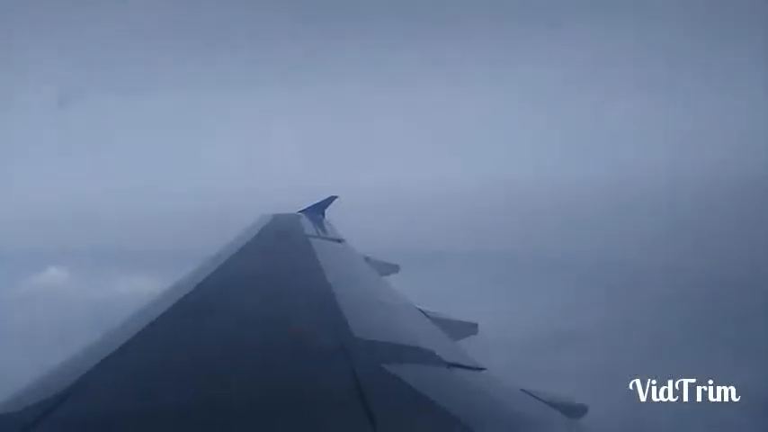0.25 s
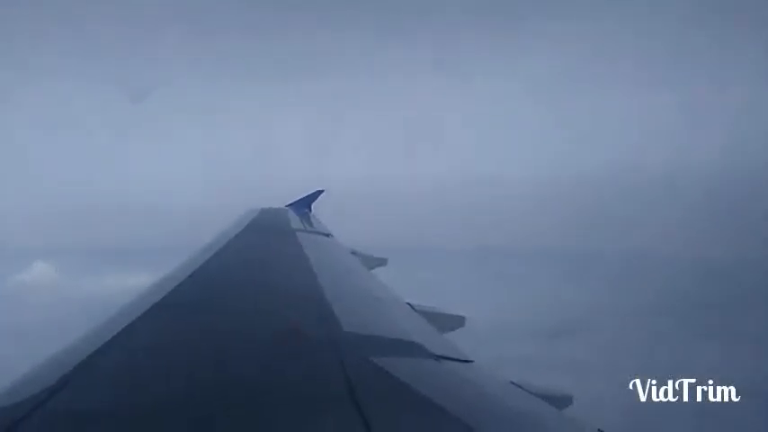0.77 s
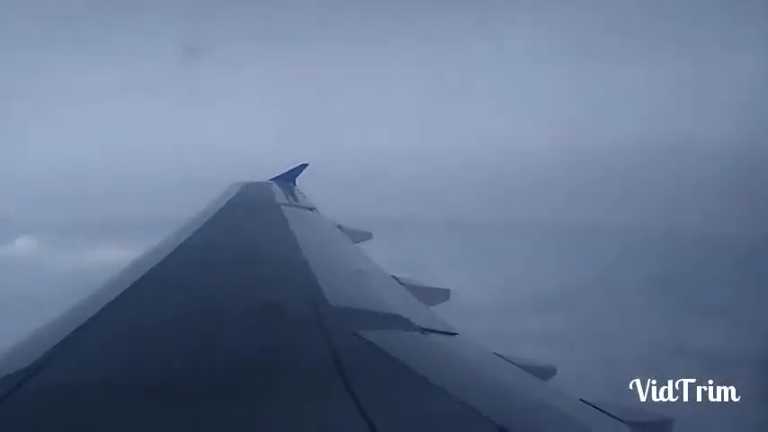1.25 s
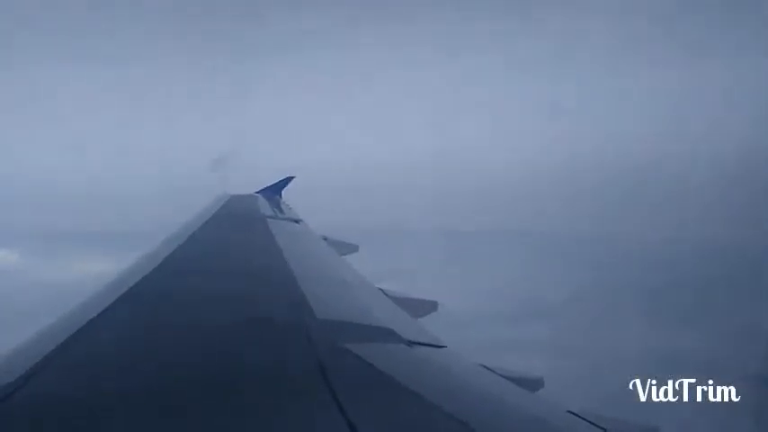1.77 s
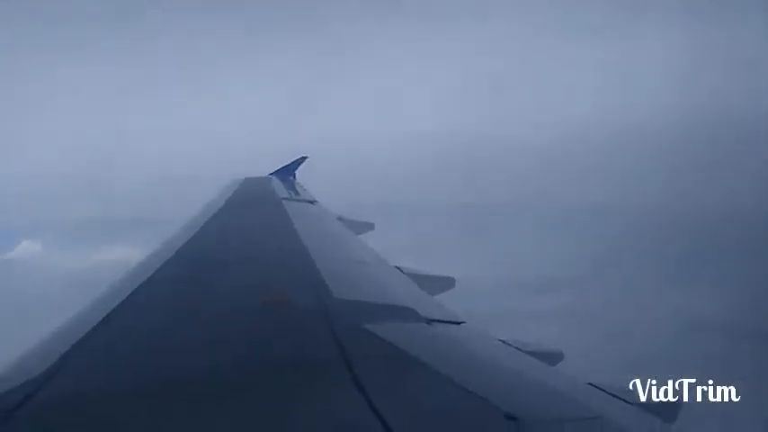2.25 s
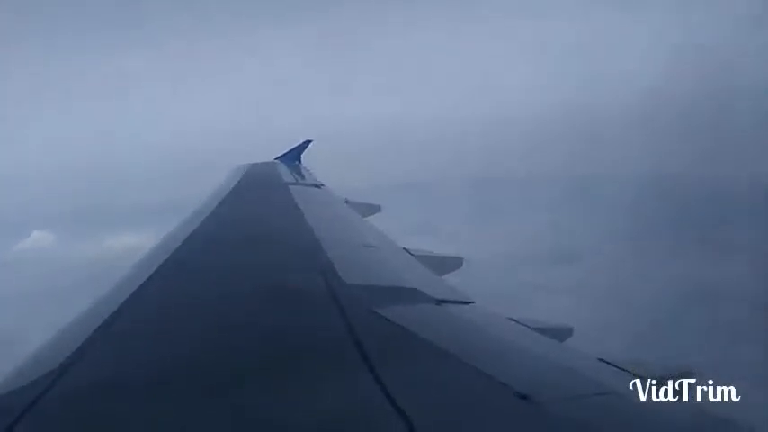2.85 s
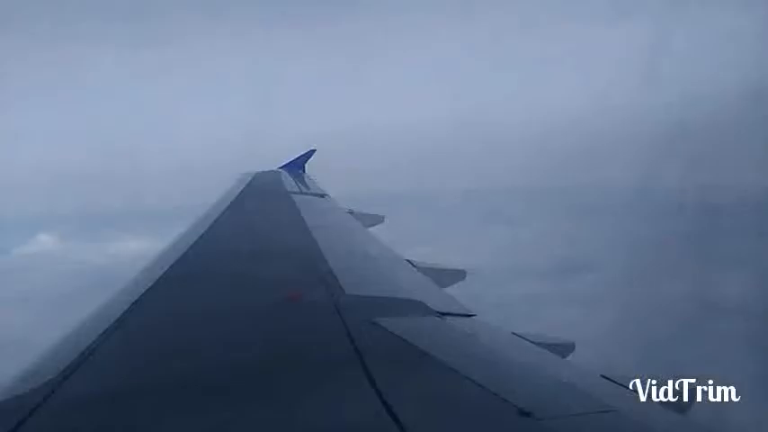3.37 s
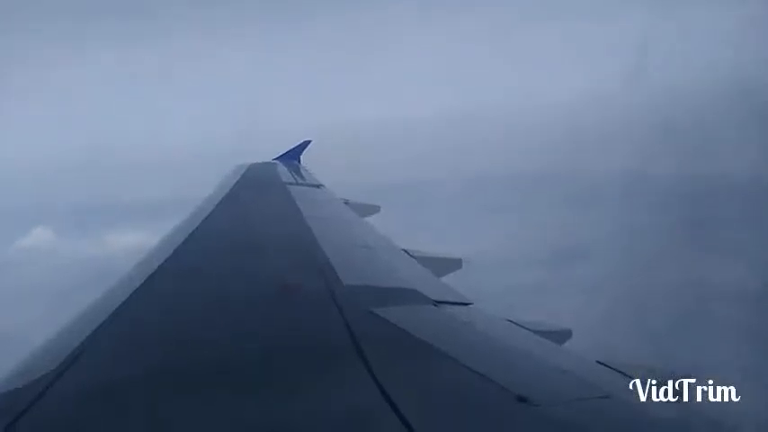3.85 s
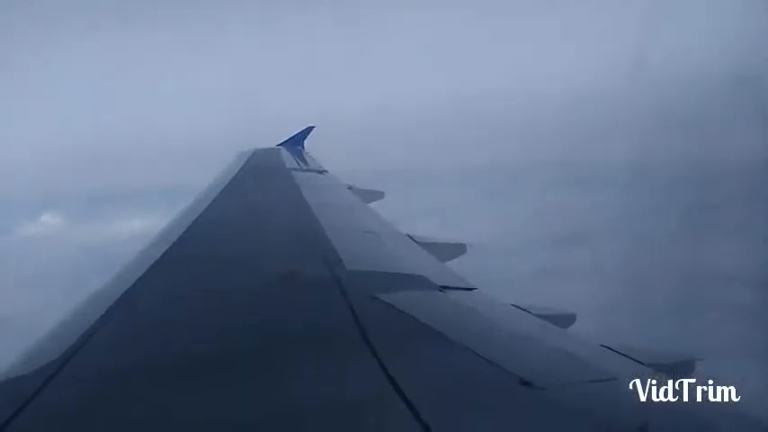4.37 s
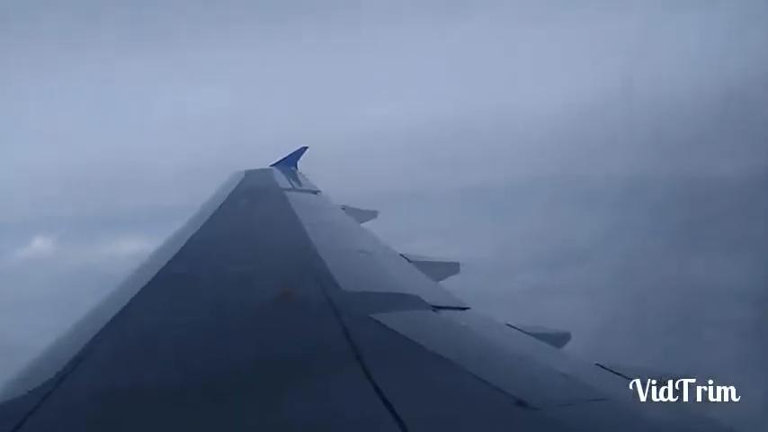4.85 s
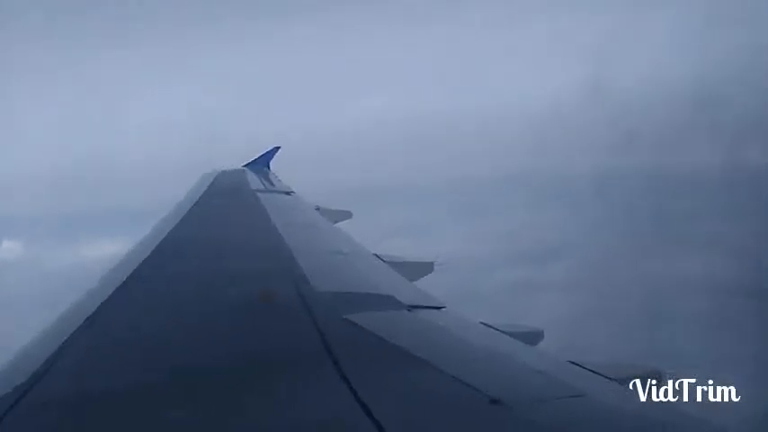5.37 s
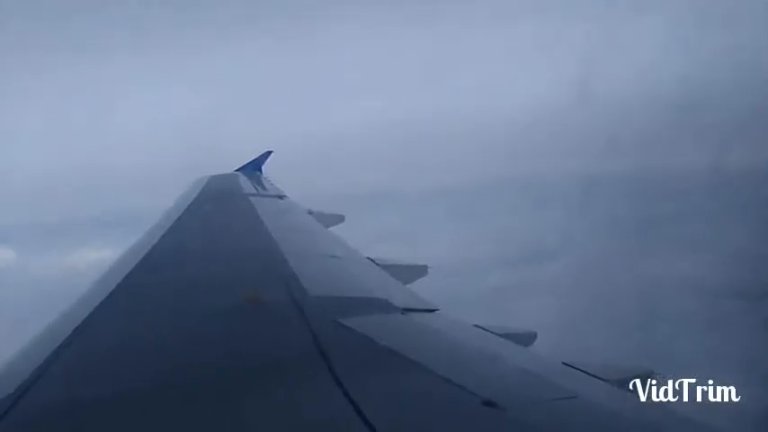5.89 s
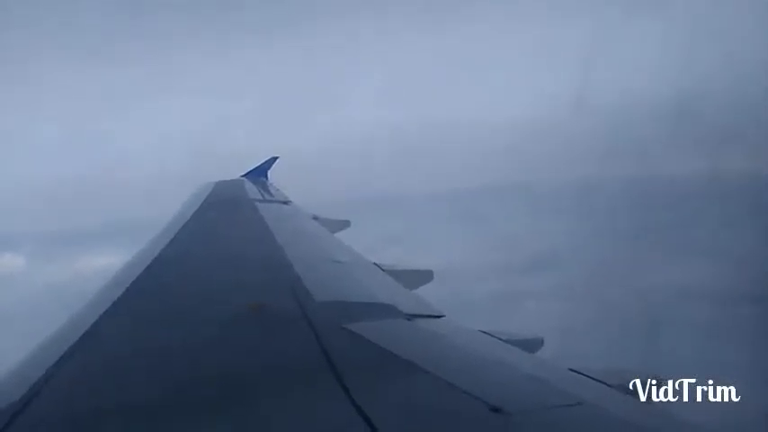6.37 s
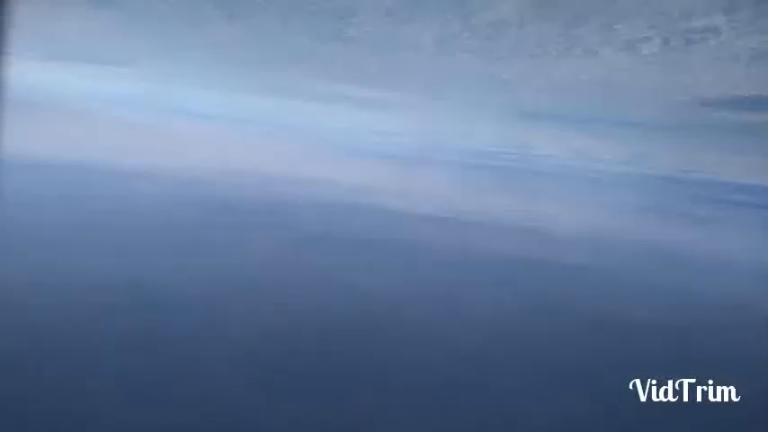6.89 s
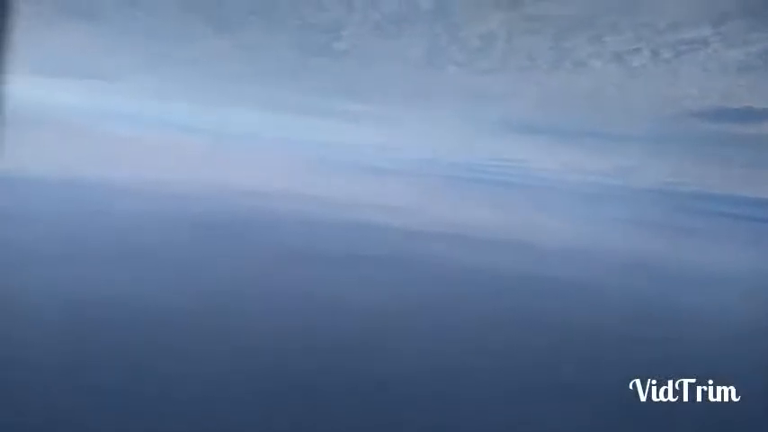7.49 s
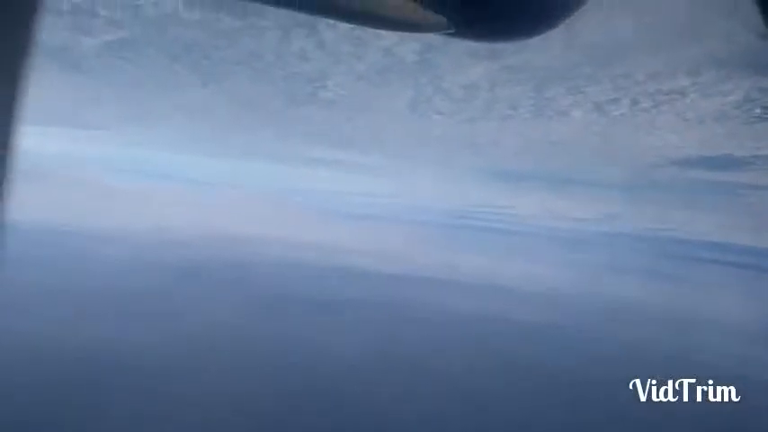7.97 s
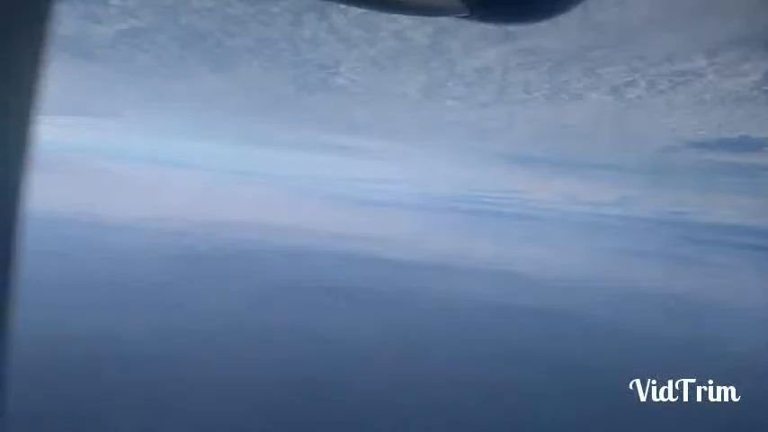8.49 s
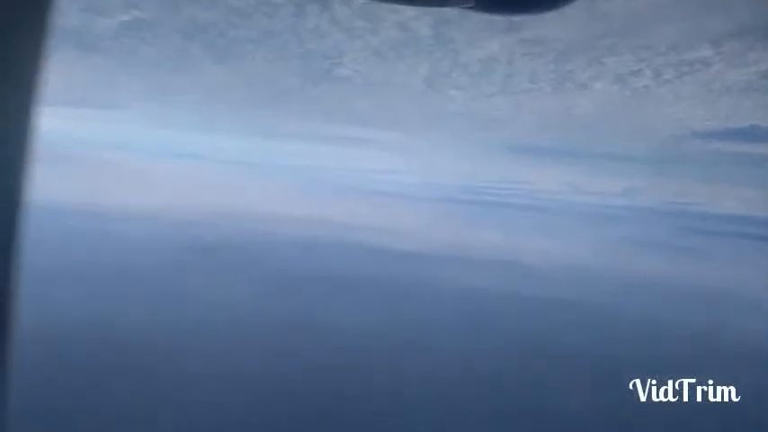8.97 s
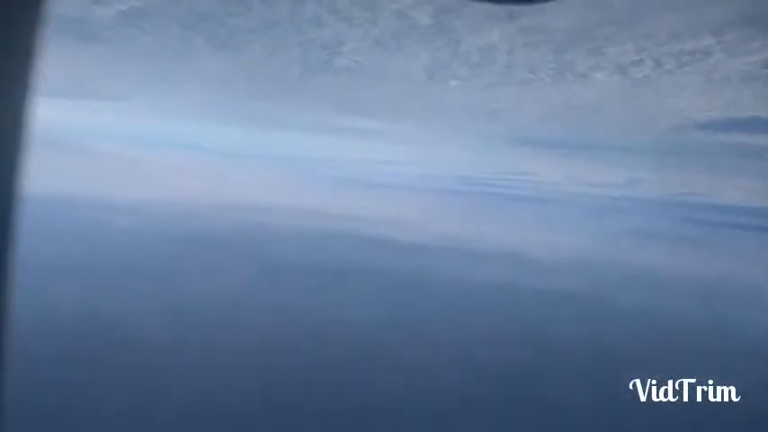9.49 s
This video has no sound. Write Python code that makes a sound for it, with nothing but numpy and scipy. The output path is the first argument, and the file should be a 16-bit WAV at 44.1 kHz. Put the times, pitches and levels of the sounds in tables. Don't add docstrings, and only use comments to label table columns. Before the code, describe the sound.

Continuous broadband cabin roar, bass-heavy and fluttering, with wavering engine hum and faint pump whine, heard close by the wall of an aircraft in flight. A soft finger rustle accompanies a change of colour early on. After an abrupt gap of silence, a louder, steadier drone with a panel hum and more vent hiss begins. A palm then half covers the microphone, dropping the level, while irregular dull thumps knock the panel.

```python
import sys
import numpy as np
from scipy import signal
from scipy.io import wavfile
from scipy.ndimage import uniform_filter1d, minimum_filter1d

SR = 44100
rng = np.random.default_rng(int(sys.argv[2]) if len(sys.argv) > 2 else 0)


def volts(x):
    e = np.asarray(x, float) / 20
    return 10 ** e


def digitize_waveform(pressure):
    field = np.atleast_2d(pressure).T
    bounded = np.clip(field, -1, 1)
    quanta = np.round(bounded * 32767).astype(np.int16)
    wavfile.write(sys.argv[1], SR, quanta)


N = 429074
FRAME, HOP = 2048, 512
CUT_S, RESUME_S = 6.77396, 7.33338

# (time [s], grip number)
GRIP = [
    (0, 0.0),
    (2.0, 0.06),
    (3.1, 0.95),
    (6.8, 1.0),
    (7.3, 2.0),
    (8.67, 2.02),
    (8.79, 2.7),
    (8.95, 2.98),
    (9.73, 3.0),
]
# (frequency [Hz], level [dB per Hz])
RUMBLE_SPECTRA = [
    [(15, -40.5), (25, -7), (125, 0), (179, -3.5), (224, 1), (334, -4.5), (600, -23.5), (780, -39.5),
     (1320, -120)],
    [(15, -37.5), (25, -4.5), (59, 4.5), (86, 6.5), (179, -0.5), (233, -2), (419, -13), (518, -21.5),
     (600, -31), (780, -48), (1320, -120)],
    [(15, -40), (25, -5.5), (65, -5), (145, 0), (194, -6), (233, -6.5), (343, -11), (408, -15),
     (518, -27.5), (600, -34), (780, -42.5), (1320, -120)],
    [(15, -42.5), (25, -1.5), (54, -11.5), (141, 0), (227, -8), (313, -13), (382, -13.5), (466, -16.5),
     (518, -22.5), (600, -26.5), (780, -34.5), (1320, -120)],
]
# (frequency [Hz], level [dB per Hz])
ROAR_SPECTRA = [
    [(260, -23.5), (450, -1), (788, -10), (1020, -14), (1390, -28), (1520, -22), (1750, -26.5), (2030, -26),
     (3300, -40), (5470, -45.5), (5900, -56), (13000, -120)],
    [(260, -25), (450, -3), (731, -0.5), (946, -3.5), (1120, -9), (1350, -11.5), (1640, -20.5),
     (2660, -27.5), (3520, -36), (4090, -35), (4910, -41), (5900, -49), (13000, -120)],
    [(260, -50.5), (450, -3.5), (570, -8), (1090, -17), (1280, -15), (2190, -22), (2990, -28.5),
     (3750, -30), (4090, -27.5), (4510, -32), (5070, -34), (5900, -39.5), (13000, -120)],
    [(260, -46.5), (450, -19), (558, -5), (1100, -18), (1340, -15), (1640, -23.5), (1770, -17),
     (1950, -24.5), (2170, -22.5), (3710, -35), (4140, -36), (5900, -38.5), (13000, -120)],
]
# (frequency [Hz], level [dB per Hz])
VENT_SPECTRA = [
    [(5500, -30), (5730, 0.5), (8200, -2), (8400, -6), (8900, -7), (9000, -10), (12000, -15), (14300, -22),
     (14500, -60)],
    [(5500, -30), (5730, 0.5), (7500, -2), (7700, -5), (8300, -6), (9000, -13), (12000, -18), (14300, -25),
     (14500, -60)],
    [(5500, -30), (5730, 2), (6400, -3), (8000, -6), (10000, -13), (12000, -18), (13000, -22), (14300, -28),
     (14500, -60)],
    [(5500, -30), (5730, -2), (6700, -4), (7500, 0), (9200, -3.5), (10300, -9), (12200, -11.5),
     (14300, -20), (14500, -60)],
]
# (frequency [Hz], width [Hz], lift [dB])
CAVITY_MODES = [
    [(102, 7.6, 1.5), (123, 9, 5.5), (145, 24, 5.5), (1004, 56, 5.5), (1255, 55, 7), (3630, 280, 6),
     (4320, 260, 5)],
    [(100.4, 4.7, 2.5), (124.5, 8.1, 4.5), (144.5, 11, 7), (1356, 100, 4.5), (1106, 35, -10),
     (2700, 120, 4)],
    [(1274, 240, 4), (2180, 110, 4.5), (4030, 220, 4.5), (4930, 420, 2.5)],
    [(350, 26, 5.5), (1290, 230, 3.5), (2160, 240, 4), (4100, 310, 10.5), (4970, 230, 3.5)],
]
# (rumble [dB], drumming [dB], roar [dB], vent [dB])
NOISE_LEVELS = [
    (-18, -24.5, -33, -70.5),
    (-19.5, -26.5, -33, -70.5),
    (-17, -22, -30.5, -58.5),
    (-25, -33, -43.5, -61.5),
]
# (time [s], frequency [Hz], lift [dB])
FINGER_GAP = [(0, 1980, 1.5), (1.6, 1994, 5), (1.8, 1980, 3.5), (1.97, 1990, 9.5), (2.1, 2080, 8),
              (2.2, 2090, 11), (2.33, 2270, 10), (2.4, 2070, 3), (2.5, 2020, 4), (2.58, 2250, 7.5),
              (2.68, 2310, 7), (2.82, 2300, 8), (2.97, 2380, 3), (3.1, 2350, 1), (3.5, 2370, 5),
              (3.9, 2360, 3), (6.8, 2350, 0)]
# (time [s], frequency [Hz], lift [dB])
PALM_SLIT = [(0, 4320, 0.5), (2.6, 4170, 0.5), (2.85, 4320, 8), (3.0, 4200, -3), (3.15, 4180, 6.5),
             (3.35, 3900, 9), (3.6, 4180, 8), (3.95, 4000, 6.5), (4.3, 4200, 2.5), (4.6, 3950, 9),
             (4.9, 4160, 8), (5.3, 4100, 5), (5.5, 4080, 6.5), (5.9, 4150, 7), (6.2, 4070, 5),
             (6.75, 4050, 4.5), (6.8, 4050, -1)]
# (time [s], frequency [Hz], lift [dB])
FINGER_SHADOW = [(0, 1750, -1), (2.1, 1750, 0.5), (2.35, 1670, -9.5), (2.6, 1680, -5), (2.85, 1760, -4),
                 (3.2, 1810, -1), (5.3, 2700, -1.5), (5.45, 2750, 5), (5.6, 2600, -1), (6.08, 2610, 1),
                 (6.13, 2600, 12), (6.19, 2800, 9), (6.25, 2750, -1), (6.8, 2700, 2.5)]
# (time [s], rumble lift [dB], drumming lift [dB])
LOW_SWELLS = [(.2, 0, 2), (0.548, 3.5, 3), (.76, -5.5, -5), (.92, 4, -3.5), (1.12, -5, 3.5), (1.3, 4, -1.5),
              (1.65, -1, 4), (1.92, -6.5, -6.5), (2.14, 5.5, -3), (2.35, -2.5, -7), (2.52, -8.5, 1),
              (2.66, 1, 0), (2.8, 3, -1), (3.05, -1, 3.5), (3.2, 2, 0.5), (3.35, 1, -4), (3.5, 0, 0),
              (3.72, 3, -1), (4.05, -2.5, -0.5), (4.18, 2, -7), (4.3, -4, 4), (4.5, -0.5, 2), (4.68, 2, -3),
              (4.85, -2.5, 2), (5.08, 1.5, 4), (5.2, 0, -4.5), (5.38, 1, -0.5), (5.55, -7, -2.5),
              (5.75, 3.5, -4.5), (6.0, -5.5, -1.5), (6.16, 4, 0), (6.35, -2, 2.5), (6.62, 8.5, 2.5),
              (7.4, 0, -2.5), (7.6, 1, -3.5), (7.849, 2, 0), (8.05, 0, 1), (8.25, -0.5, -6), (8.42, -1.5, -6),
              (8.6, -2, -1), (8.8, -5, -6.5), (8.94, -1.5, -2), (9.02, 0, 0), (9.2, -4, 0.5), (9.36, -2, -3.5),
              (9.5, -0.5, 2), (9.62, -7, 1)]
# (time [s], lift [dB])
PUMP_WHINE = [(0, 2), (.08, 2.5), (.15, -3), (.3, -3), (.4, -5), (.58, 5.5), (.75, -1), (1.0, 5),
              (1.2, 0.5), (1.4, -9), (1.63, 5.5), (1.77, -2), (1.87, 7), (2.0, -10), (2.18, -2), (2.5, -4),
              (2.7, -9), (3.2, 2), (3.55, -6), (3.75, -2), (4.1, -5), (4.35, -4), (4.45, 9), (4.58, 2),
              (4.7, 6), (5.05, 1), (5.2, -12), (5.5, 10), (5.68, -3), (5.8, -6.5), (6.2, 6), (6.4, 2),
              (6.7, 1.5)]
# (time [s], lift [dB])
FAN_BEAT = [(0, 4), (.25, 9.5), (.6, 8.5), (.8, -1), (4.6, -1.5), (4.9, 9), (5.1, 0), (5.25, 19),
            (5.38, 11), (5.5, 17.5), (5.74, 18.5), (5.85, 10.5), (6.0, 17.5), (6.2, 7), (6.38, 9),
            (6.55, 17.5), (6.75, 7)]
# (time [s], lift [dB])
CORE_BEAT = [(0, 3), (.55, -6.5), (.7, 2.5), (.8, -6), (.9, 6), (1.15, 0.5), (2.2, 2), (2.35, -4),
             (2.85, 4.5), (3.1, 0.5), (3.9, -1), (4.04, -4), (4.3, 1.5), (4.8, -2), (5.0, 7), (5.4, -0.5),
             (5.65, -1.5), (5.85, 3), (6.7, 4)]
# (time [s], peak [dB])
RUSTLES = [
    (1.9487, -49.5),
    (2.6994, -55.5),
    (2.7401, -55.5),
    (2.77, -56.5),
    (2.8096, -55),
    (2.8592, -50.5),
    (2.909, -60),
    (2.9481, -55),
    (3.0302, -59.5),
    (6.28, -66),
]
# (time [s], peak [dB])
BUMPS = [
    (8.803, -13),
    (8.978, -9.5),
    (9.069, -15),
    (9.171, -10),
    (9.279, -21.5),
    (9.35, -10),
    (9.409, -12),
    (9.497, -15.5),
    (9.688, -14),
]
# (frequency [Hz], level [dB], t60 [s])
BUMP_MODES = [
    (157.9, -3, 0.2),
    (262, -7, 0.067),
    (376, -13.5, 0.17),
    (64.7, -12, 0.17),
]


def drift(rate_hz, count=1):
    r = np.exp(-2 * np.pi * rate_hz * HOP / SR)
    white = rng.standard_normal((count, 4 * N // FRAME + 404))
    slow = signal.lfilter([1], [1, -2 * r, r * r], white)[:, 400:]
    return slow / slow.std(axis=1, keepdims=True)


def drift_samples(rate_hz):
    return np.interp(np.arange(N) / HOP, np.arange(4 * N // FRAME + 4), drift(rate_hz)[0])


def by_grip(levels_db):
    grip = np.interp(np.arange(N) / SR, *np.transpose(GRIP))
    return np.interp(grip, np.arange(4), levels_db)


def colour(spectrum, modes, hz):
    at_hz, level_db = np.transpose(spectrum)
    total_db = np.interp(np.log(hz), np.log(at_hz), level_db, left=-120, right=-120)
    for mode_hz, width_hz, lift_db in modes:
        total_db = total_db + lift_db / (1 + (2 * (hz - mode_hz) / width_hz) ** 2)
    return total_db


def opening(track, width_hz, hz, s):
    at_s, at_hz, lift_db = np.transpose(track)
    offset_hz = hz[:, None] - np.interp(s, at_s, at_hz)
    return np.interp(s, at_s, lift_db) / (1 + (2 * offset_hz / width_hz) ** 2)


def turbulence(spectra, level_db, shared_db, patchy_db, gust_hz, span_hz=(1, 30000), tremor=0):
    stft = dict(nperseg=FRAME, noverlap=FRAME - HOP)
    hz, s, cells = signal.stft(rng.standard_normal(N), SR, **stft)
    hz = np.maximum(hz, 1)
    grip = np.interp(s, *np.transpose(GRIP))
    shares = np.clip(1 - abs(grip - np.arange(4)[:, None]), 0, 1)
    grip_db = np.transpose([colour(c, m, hz) for c, m in zip(spectra, CAVITY_MODES)]) @ shares
    hand_db = opening(FINGER_GAP, 280, hz, s) + opening(PALM_SLIT, 390, hz, s)
    hand_db += opening(FINGER_SHADOW, 280, hz, s)
    gain = volts(grip_db + hand_db)

    shifted = np.outer(np.arange(len(hz)), 1 + tremor * drift(4)[0, :len(s)])
    shifted = np.clip(np.rint(shifted), 0, len(hz) - 1).astype(int)
    gain = np.take_along_axis(gain, shifted, axis=0)
    gain *= ((hz >= span_hz[0]) & (hz < span_hz[1]))[:, None]
    gain /= np.sqrt(np.mean(gain ** 2, axis=0))

    octaves = np.log2(hz / 20)
    third = np.clip(3 * octaves, 0, 30).astype(int)
    twelfth = np.clip(12 * octaves, 0, 120).astype(int)
    flicker_db = drift(gust_hz, count=31)[third] * patchy_db + drift(5.3) * shared_db
    fleck_db = 1.5 / (1 + (hz[:, None] / 2000) ** 2)
    flicker_db += fleck_db * drift(8, count=121)[twelfth]
    noise = signal.istft(cells * gain * volts(flicker_db[:, :len(s)]), SR, **stft)[1]
    return volts(level_db) * noise[:N]


def cabin_air(roar_db):
    t = np.arange(N) / SR
    first = t < CUT_S
    rumble_db, drum_db, _, vent_db = map(by_grip, np.transpose(NOISE_LEVELS))
    for s, rumble_lift_db, drum_lift_db in LOW_SWELLS:
        swell = np.exp(-((t - s) / 0.069) ** 2)
        rumble_db = rumble_db + rumble_lift_db * swell
        drum_db = drum_db + drum_lift_db * swell
    vent_db = vent_db + first * 1.4 * np.maximum(t - 3.9, 0)
    air = turbulence(RUMBLE_SPECTRA, rumble_db, shared_db=0.6, patchy_db=2.2, gust_hz=4.9, span_hz=(1, 250))
    air += turbulence(RUMBLE_SPECTRA, drum_db, shared_db=1.3, patchy_db=2.08, gust_hz=11.0, span_hz=(250, 2000))
    air += turbulence(ROAR_SPECTRA, roar_db + 2.5, shared_db=1.0, patchy_db=1.82, gust_hz=25.0,
                      span_hz=(1, 5730), tremor=0.008)
    air += turbulence(VENT_SPECTRA, vent_db, shared_db=1.1, patchy_db=-0.1, gust_hz=8.0)
    flutter_db = 0.5 * np.where(first, 1, 0.3)
    return air * volts(flutter_db * drift_samples(14))


def hum(hz, level_db, wobble_db, multiple=1):
    level = np.sqrt(2) * volts(level_db + wobble_db * drift_samples(5.0))
    return level * np.sin(2 * np.pi * multiple * np.cumsum(hz) / SR)


def tone(sitting_hz, grip_db, wobble_db, lift_db=0, multiple=1):
    hz = np.where(np.arange(N) < CUT_S * SR, *sitting_hz)
    return hum(hz, by_grip(grip_db) + lift_db, wobble_db, multiple)


def pumps():
    t = np.arange(N) / SR
    pump_hz = (518.8, 521.8)
    whine_db = (t < CUT_S) * np.interp(t, *np.transpose(PUMP_WHINE))
    out = tone(pump_hz, (-47.5, -41, -32.5, -42), wobble_db=-2.0)
    out += tone(pump_hz, (-52, -58, -45, -60), wobble_db=1.1, lift_db=whine_db, multiple=3)
    return out + tone(pump_hz, (-76, -78, -64, -73), wobble_db=1.5, multiple=6)


def shafts():
    t = np.arange(N) / SR
    first = t < CUT_S
    core_lift_db = first * np.interp(t, *np.transpose(CORE_BEAT))
    fan_lift_db = first * np.interp(t, *np.transpose(FAN_BEAT))
    core = tone((225.3, 226.3), (-26.5, -30.5, -24.5, -38.5), wobble_db=1.9, lift_db=core_lift_db)
    return core + tone((69.4, 70.0), (-38.5, -37.5, -30, -47), wobble_db=-0.1, lift_db=fan_lift_db)


def pack_whine(roar_db):
    return hum(np.full(N, 1192.4), roar_db + 31.5 - 56.5, wobble_db=-1.5)


def booms():
    panel = tone((158.0, 158.0), (-50, -52, -23.5, -39.5), wobble_db=1.5)
    return panel + tone((90, 140), (-50.5, -52, -36.5, -39.5), wobble_db=1.5)


def rustles():
    t = np.arange(N) / SR
    envelope = volts(-75) * np.exp(-((t - 2.81) / 0.19) ** 4)
    for s, peak_db in RUSTLES:
        envelope = envelope + volts(peak_db - 13) * np.exp(-((t - s - 0.006) / 0.016) ** 2)
    return envelope * turbulence(VENT_SPECTRA, 0, shared_db=1.5, patchy_db=1.8, gust_hz=15.0)


def bumps():
    t = np.arange(SR // 2) / SR
    out = np.zeros(N + SR)
    contact = 1 - np.exp(-t / 0.002)
    chances_db = rng.normal(0, 2, (len(BUMPS), len(BUMP_MODES)))
    for (s, peak_db), chance_db in zip(BUMPS, chances_db):
        start = int(s * SR)
        for (hz, level_db, t60_s), extra_db in zip(BUMP_MODES, chance_db):
            decay = volts(peak_db + level_db + extra_db - 60 * t / t60_s)
            out[start:start + len(t)] += decay * contact * np.sin(2 * np.pi * hz * t)
    return out[:N]


def scene():
    roar_db = by_grip(np.transpose(NOISE_LEVELS)[2])
    air = cabin_air(roar_db)
    tones = pumps() + shafts() + pack_whine(roar_db) + booms()
    return (air + tones + rustles() + bumps())[None]


def limiter(x):
    ceiling, span = 0.68, 441
    need = np.minimum(1, ceiling / (abs(x) + 1e-9))
    need = minimum_filter1d(need, 2 * span + 1)
    return x * uniform_filter1d(uniform_filter1d(need, span), span)


def handling_shake():
    low_pass = signal.butter(4, 36, fs=SR, output="sos")
    shake = signal.sosfilt(low_pass, rng.standard_normal(N))
    return volts(by_grip((-46, -50, -61, -52))) * shake / shake.std()


def roll_off(x):
    return signal.sosfilt(signal.butter(12, 15700, fs=SR, output="sos"), x)


def record(dry):
    t = np.arange(N) / SR
    bass_cut = signal.butter(10, 41, "high", fs=SR, output="sos")
    heard = limiter(signal.sosfilt(bass_cut, dry)) + handling_shake()
    # (time [s], full scale)
    for s, pressure in (0, -0.19), (CUT_S, 0.25), (RESUME_S, -0.16), ((N - 1) / SR, 0.07):
        pull = pressure - heard[:, [round(s * SR)]]
        heard = heard + pull * np.exp(-0.5 * ((t - s) / 0.003) ** 2)
    splice = (t < CUT_S) + np.clip((t - RESUME_S) / 0.001, 0, 1)
    treble_cut = signal.butter(12, 15600, fs=SR, output="sos")
    return roll_off(signal.sosfiltfilt(treble_cut, heard * splice))


dry = scene()
out = record(dry)
digitize_waveform(out)
```